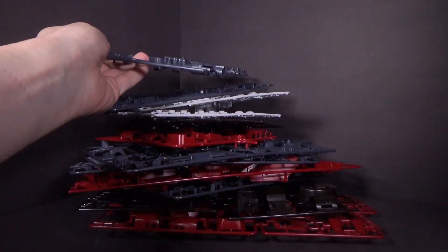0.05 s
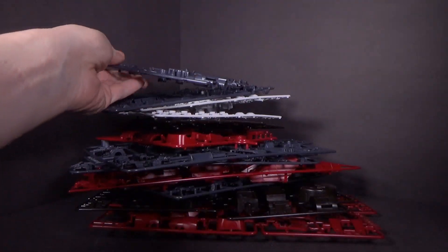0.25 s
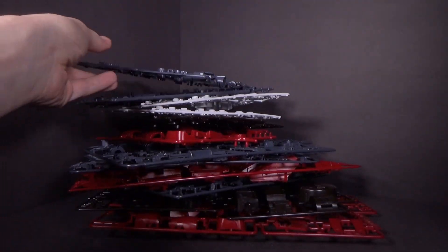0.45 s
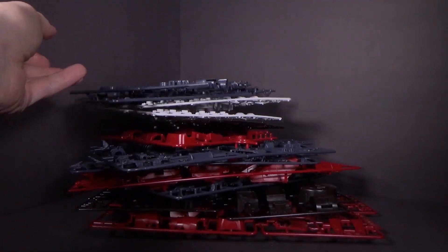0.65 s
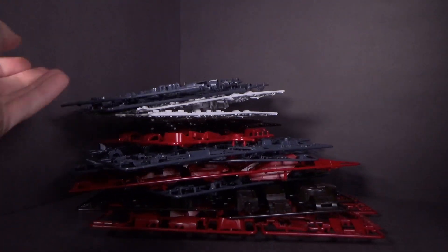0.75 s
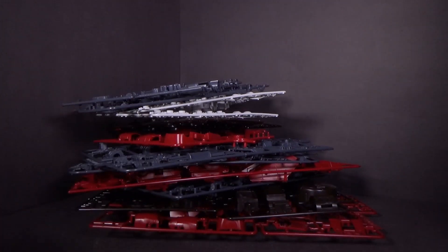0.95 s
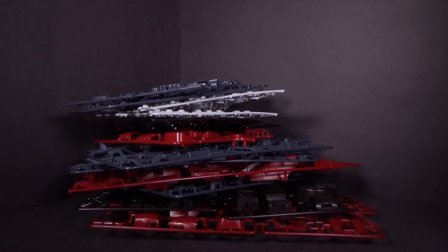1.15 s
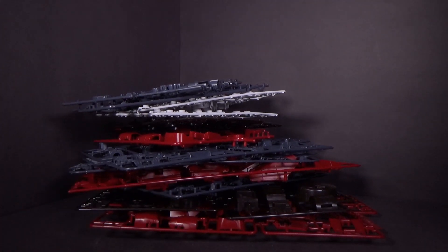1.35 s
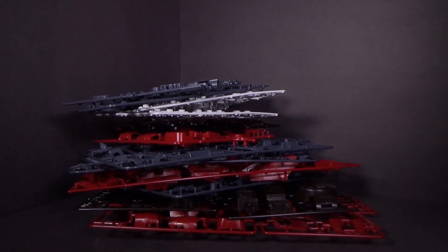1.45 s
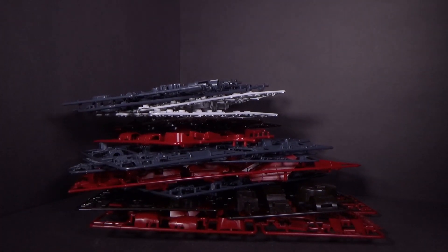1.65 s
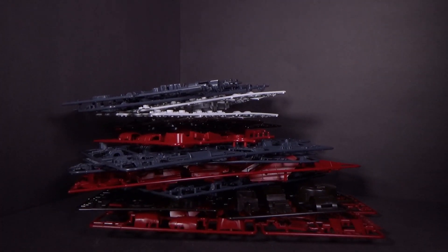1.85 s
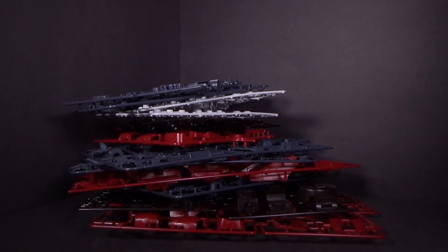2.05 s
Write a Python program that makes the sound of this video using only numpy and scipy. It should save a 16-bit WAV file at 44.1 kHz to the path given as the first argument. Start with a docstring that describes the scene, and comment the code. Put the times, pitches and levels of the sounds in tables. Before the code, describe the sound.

Close up indoors, hard thin plastic ticks once, then clatters and rubs as it is let go on a loose pile; after near silence, a louder sharp snap and small slipping scrapes, with faint low thumps underneath.

```python
"""Plastic frame laid on a stack

A plastic parts frame is laid on a stack of others, close by in a small, dead room.
It taps down, slides and is let go; after a pause the stack snaps and slips as it settles.
Every contact is a cluster of tiny clicks that ring the plastic; the springy pile thumps softly underneath.
Low judder and room tone lie below; a noise suppressor and a steep treble cut shape the whole."""
import sys
import numpy as np
from scipy import signal
from scipy.fft import rfft, irfft
from scipy.io import wavfile
from scipy.ndimage import uniform_filter1d

SR = 44100
rng = np.random.default_rng(int(sys.argv[2]) if len(sys.argv) > 2 else 0)


def bounce(signal):
    """Save signal as a 16-bit WAV file at the path given by the first command-line argument."""
    frames = np.transpose(np.atleast_2d(signal))
    limited = np.clip(frames, -1, 1)
    pcm = np.round(limited * 32767).astype(np.int16)
    wavfile.write(sys.argv[1], SR, pcm)


N = 92433

# knocks of frame on frame: start_s, level_db, rise_s, decay_s, repeat_gap_s,
# bright_hz, lift_db, body_db, low_middle_db, middle_db, top_db
TAP_EVENTS = [(0.1283, -29.5, 0.0016, 0.013, .0155, 7300, 5, -2, 1, -1, 2),
              (0.425, -39, 0.0032, 0.0096, 0.015, 7500, 2, -11.5, -5, -9, 0),
              (.522, -41, .002, 0.0069, 0.012, 7390, 8.5, -7.5, 3, -6, -0.5),
              (.587, -47.5, 0.002, .009, 0.011, 9620, 8, 0, 6.5, -0.5, -11.5),
              (0.6195, -42.5, 0.0013, 0.054, 0.022, 9100, -2, -8, -0.5, -8.5, -4),
              (0.649, -30, .0015, 0.027, .009, 9500, 0.5, -2, -6, -4.5, -8.5),
              (0.671, -29, 0.0037, 0.0084, 0.015, 8670, -2.5, -3.5, -5, -8, 1.5),
              (0.771, -29.5, 0.0051, .009, 0.0092, 10010, 5, 0.5, 0, -5.5, 0),
              (0.803, -28, .003, .005, 0.016, 7860, 17, -3.5, -5, 1.5, 3),
              (1.6291, -21, 0.0056, 0.0046, .016, 8770, 10, -1.5, 5, 10.5, 4),
              (1.72, -33.5, 0.0095, 0.016, 0.015, 9000, -0.5, 3.5, -0.5, 6.5, -1.5),
              (1.989, -32, 0.0021, 0.0051, 0.015, 8600, 1, 13.5, -9, 12, -14)]
TAP_CLICKS_PER_S, TAP_REPEAT_DB = 3100, -1.5
GRAZE_GROWTH_S, GRAZE_DB = 0.01, -21.5  # e-fold time, peak


def taps(t):
    """Short knocks: the edges graze with growing force, then knock; each tap sounds twice."""
    out = np.zeros(N)
    for start_s, level_db, rise_s, decay_s, gap_s, *place in TAP_EVENTS:
        peak_s = start_s + rise_s
        graze = undb(GRAZE_DB) * np.exp(-np.abs(t - peak_s) / GRAZE_GROWTH_S) * (t < peak_s)
        force = graze + envelope(t - start_s, rise_s, 0, decay_s)
        knock = contact(force, TAP_CLICKS_PER_S, *place)
        out += undb(level_db) * doubled(knock, gap_s, TAP_REPEAT_DB)
    return out


# rubs of edges over parts: start_s, level_db, rise_s, hold_s, decay_s,
# bright_hz, lift_db, body_db, low_middle_db, middle_db, top_db
SCRAPE_EVENTS = [(0.207, -63.5, .012, 0.099, 0.018, 10460, 5, -5, -6, -5.5, -1.5),
                 (0.327, -52, 0.042, .004, 0.016, 7020, 14, 4, 0, -3, -9.5),
                 (0.484, -56, 0.026, 0.04, 0.044, 7320, 1, -2.5, 7.5, 0.5, -2.5),
                 (0.673, -36.5, 0.012, 0.03, 0.057, 9030, 2.5, 1.5, -4, -6.5, -8),
                 (.677, -42, 0.0053, 0.027, 0.026, 1403, 32, 0.5, -3.5, -4, -1),
                 (0.764, -36.5, 0.034, 0.027, 0.03, 8190, 5, 9.5, 4, 1.5, -5.5),
                 (0.931, -67.5, 0.016, 0.062, 0.027, 2830, 5, 26.5, 13.5, 10, -0.5),
                 (1.481, -49.5, 0.051, 0.021, .022, 3660, 11, -3, 3, 2, -3.5),
                 (1.592, -50, 0.038, 0.12, 0.039, 9400, 5.5, 11, 11, 9, -3),
                 (1.785, -59, .067, 0.036, 0.051, 8510, 3, -0.5, 6, 4, -6),
                 (1.868, -51.5, 0.014, 0.097, 0.0076, 4700, 7.5, 12, 9.5, 9, 0),
                 (1.928, -31, 0.022, 0.0038, .014, 812, 20.5, 8, 8, 9.5, 1),
                 (1.953, -31.5, 0.017, .028, .017, 1684, 18, 4, -0.5, 6.5, -7.5)]
SCRAPE_CLICKS_PER_S, SCRAPE_REPEAT_S, SCRAPE_REPEAT_DB = 1300, 0.012, -7.5


def scrapes(t):
    """Edges catch and slip across the parts below: longer, sparser clicks with a faint repeat."""
    rubs = np.zeros(N)
    for start_s, level_db, rise_s, hold_s, decay_s, *place in SCRAPE_EVENTS:
        force = envelope(t - start_s, rise_s, hold_s, decay_s)
        rubs += undb(level_db) * contact(force, SCRAPE_CLICKS_PER_S, *place)
    return doubled(rubs, SCRAPE_REPEAT_S, SCRAPE_REPEAT_DB)


# spectrum of one contact: freq_hz, gain_db
CONTACT_SPECTRUM = [(150, -19), (300, -27.5), (480, -16), (1100, -15.5), (1500, -21), (2200, -10),
                    (3300, -8.5), (4000, -2), (5500, -8.5), (7800, 0), (10000, 0.5), (12500, -6),
                    (16000, -15)]
# band centres of body, low middle, middle, bright and top: centre_hz
PLACE_HZ = (1200, 2600, 4200, 8300, 13000)
BRIGHT_OCTAVES, CLICK_SPREAD_DB = 0.13, 2
PART_HOLD_S = 0.009  # shortest stay on one part


def contact(env, clicks_per_s, bright_hz, lift_db, body_db, low_middle_db, middle_db, top_db,
            parts=2, size=300):
    """Tiny uneven clicks hop between touching parts; each part rings its own way, coloured by the place."""
    hits = (rng.random(N) < clicks_per_s / SR) * rng.choice([-1, 1], N)
    hits = hits * undb(CLICK_SPREAD_DB * rng.standard_normal(N))
    local_power = np.abs(uniform_filter1d(hits ** 2, size)) + 1e-9
    clicks = env * hits / np.sqrt(local_power)  # level follows env, not click density
    hop = (np.arange(N) / SR / PART_HOLD_S).astype(int)
    part = rng.integers(0, parts, N)[hop]
    place = list(zip(PLACE_HZ, (body_db, low_middle_db, middle_db, 0, top_db)))

    def shape_db(hz):
        octaves = np.log2(hz / bright_hz)
        bright = lift_db * np.exp(-(octaves / BRIGHT_OCTAVES) ** 2)
        return slope(hz, CONTACT_SPECTRUM) + slope(hz, place) + bright

    rattle = sum(signal.fftconvolve(clicks * (part == k), frame())[:N] for k in range(parts))
    return unit(colour(rattle, shape_db)) * np.sqrt(np.sum(env ** 2))


# ringing modes of a frame: freq_hz, relative_db, t60_s
FRAME_MODES = [(843, -8, 0.04), (1290, -7.5, 0.097), (1823, 2.5, 0.064), (3850, -4.5, 0.045),
               (4037, -1, 0.059), (4257, -3, 0.032), (5140, -25, 0.019), (7750, 2, 0.034), (8930, 2, 0.018),
               (9640, 2.5, 0.026)]
CRACK_FADE_S, CRACK_DB, RING_DB = 0.015, 0.5, -9.5  # energies relative to the tick


def frame():
    """Response of a frame to one click: the tick, a dense, short crack and its modes."""
    crack = tail(CRACK_FADE_S)
    t = np.arange(len(crack)) / SR
    ring = np.zeros(len(t))
    for freq_hz, relative_db, t60_s in FRAME_MODES:
        swing = np.sin(2 * np.pi * (freq_hz * t + rng.random()))
        ring += undb(relative_db) * unit(fade(t60_s) * swing)
    tick = t == 0
    return tick + undb(CRACK_DB) * crack + undb(RING_DB) * unit(ring)


# soft thumps of the pile: peak_s, pitch_hz, peak_db, width_s (envelope 0.29 of peak at +-width_s)
THUMP_EVENTS = [(0.083, 66.5, -39.5, 0.014), (0.13, 103, -40.5, 0.0051), (0.168, 113, -40.5, 0.02),
                (0.254, 85.2, -43, 0.028), (0.363, 64, -38.5, .012), (.416, 52, -43.5, 0.025),
                (.527, 80, -37.5, 0.015), (0.581, 116.7, -36.5, 0.01), (0.57, 233, -49, .014),
                (0.66, 77.1, -41.5, 0.038), (0.816, 116.9, -34, 0.022), (0.868, 109.5, -42.5, .018),
                (0.865, 255, -39, .012), (.958, 98, -36.5, 0.011), (.988, 289.6, -46, 0.0065),
                (1.04, 68, -35, 0.012), (1.173, 98.1, -44, 0.013), (1.255, 45.75, -49, .02),
                (1.387, 93.2, -38.5, 0.012), (1.564, 58, -43, 0.02), (1.773, 100.2, -46, 0.04),
                (1.838, 47, -44, .012), (1.982, 88.5, -44, 0.014)]


def thumps(t):
    """A few slow swings of the springy pile swell and die."""
    out = np.zeros(N)
    for peak_s, pitch_hz, peak_db, width_s in THUMP_EVENTS:
        swell = np.exp(1 - np.hypot(1, 2 * (t - peak_s) / width_s))
        swing = np.sin(2 * np.pi * (pitch_hz * (t - peak_s) + rng.random()))
        out += undb(peak_db) * swell * swing
    return out


# judder level over time: time_s, rms_db
JUDDER_LEVEL = [(0, -58.5), (.4, -55.5), (.62, -56), (.72, -43), (.85, -46), (.92, -53.5), (1.12, -61),
                (2.02, -60.5), (2.07, -101)]
# judder spectrum: freq_hz, relative_db
JUDDER_SPECTRUM = [(20, 5.5), (45, -7.5), (125, 5), (190, -7), (570, -15), (750, -33), (1500, -49.5)]


def judder(t):
    """Low rumble of the pile, strongest while the frame slides: noise under a level curve."""
    time_s, rms_db = np.array(JUDDER_LEVEL).T
    return undb(np.interp(t, time_s, rms_db)) * noise(JUDDER_SPECTRUM)


# room tone spectrum: freq_hz, relative_db
AIR_SPECTRUM = [(20, -7), (170, -1.5), (300, -13), (560, -4.5), (720, -22.5), (1150, -6), (1550, -34.5),
                (2500, -17), (5000, -22), (16000, -24)]
AIR_RMS_DB = -60.5


def room_tone():
    """Steady coloured noise of the room."""
    return undb(AIR_RMS_DB) * noise(AIR_SPECTRUM)


ROOM_FADE_S, ROOM_DB = 0.11, -12


def room(x):
    """Short diffuse reflections: the sound convolved with dying noise."""
    return undb(ROOM_DB) * signal.fftconvolve(x, tail(ROOM_FADE_S))[:N]


def envelope(t, rise_s, hold_s, decay_s):
    """Pressure builds, holds and dies away."""
    return np.clip(t / rise_s, 0, 1) ** 2 * np.exp(-np.maximum(t - rise_s - hold_s, 0) / decay_s)


def doubled(x, gap_s, db):
    """A sound plus its close repeat."""
    return x + undb(db) * np.pad(x, (int(gap_s * SR), 0))[:N]


def undb(db):
    """Decibels to gain."""
    return 10 ** (np.asarray(db) / 20)


def unit(x):
    """Scale to an energy of one."""
    return x / np.sqrt(np.sum(x ** 2) + 1e-30)


def slope(hz, points):
    """Read (Hz, dB) points on a log-frequency axis."""
    f, db = np.array(points).T
    return np.interp(np.log(hz), np.log(f), db)


def colour(x, db_at, size=4096):
    """Causal minimum-phase filter, built from the folded cepstrum of its gain in dB."""
    hz = np.maximum(np.fft.rfftfreq(size, 1 / SR), 1)
    cepstrum = irfft(np.log(undb(db_at(hz))))
    cepstrum[1:size // 2] *= 2
    cepstrum[size // 2 + 1:] = 0
    return signal.fftconvolve(x, irfft(np.exp(rfft(cepstrum))))[:len(x)]


def noise(points):
    """Coloured noise with an rms of one."""
    white = rng.standard_normal(N)
    return unit(colour(white, lambda hz: slope(hz, points))) * np.sqrt(N)


def fade(t60_s, size=12000):
    """Exponential decay."""
    return np.exp(-np.log(1000) * np.arange(size) / SR / t60_s)


def tail(fade_s, size=24):
    """Dying noise with an even broad spectrum; it is faded by env and again by its root."""
    env = fade(fade_s)
    spectrum = rfft(env * rng.standard_normal(len(env)))
    local_power = np.convolve(np.abs(spectrum) ** 2, np.hanning(size * 4), "same")
    burst = irfft(spectrum / np.sqrt(local_power))
    return unit(burst * np.sqrt(env))


def scene():
    """The plastic with a short room tail, over the low sounds and the room tone."""
    t = np.arange(N) / SR
    plastic = taps(t) + scrapes(t)
    return (plastic + room(plastic) + thumps(t) + judder(t) + room_tone())[None]


SUPPRESS_OVER_DB = 7.5  # half gain this far over the quiet level
SUPPRESS_FLOOR_DB, SUPPRESS_SLOPE = -32, 3


def suppress(x, size=2048):
    """Noise suppressor: each frequency is turned down near its quiet level; the room tone warbles."""
    overlap = size - size // 4
    z = signal.stft(x, nperseg=size, noverlap=overlap)[2]
    power = uniform_filter1d(np.abs(z) ** 2, size=3, axis=-1).clip(1e-30)
    low_power = np.log(np.percentile(power, 15, axis=-1))
    quiet = np.exp(uniform_filter1d(low_power, size=5, axis=-1))[..., None]
    over = (power / quiet / undb(SUPPRESS_OVER_DB) ** 2) ** SUPPRESS_SLOPE
    gain = np.maximum(over / (1 + over), undb(SUPPRESS_FLOOR_DB))
    return signal.istft(z * gain, nperseg=size, noverlap=overlap)[1][..., :N]


TOP_HZ = 16000


def record(dry):
    """Suppress steady noise, then cut the top with a steep elliptic lowpass."""
    lowpass = signal.ellip(10, .2, 80, TOP_HZ, fs=SR, output="sos")
    return signal.sosfilt(lowpass, suppress(dry))


dry = scene()
out = record(dry)
bounce(out)
```